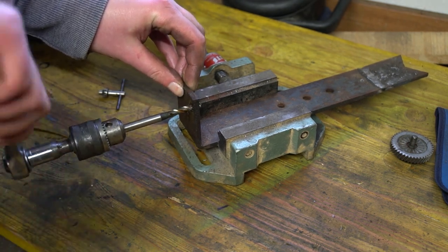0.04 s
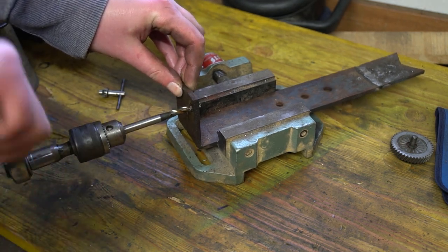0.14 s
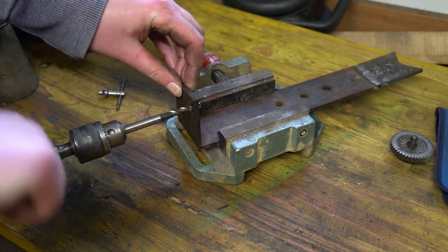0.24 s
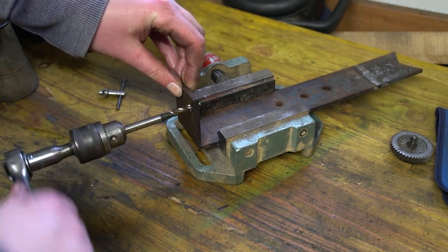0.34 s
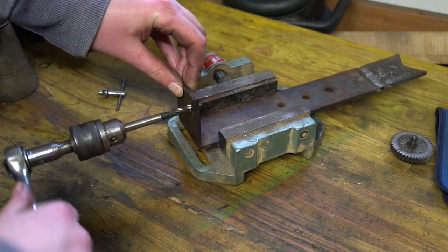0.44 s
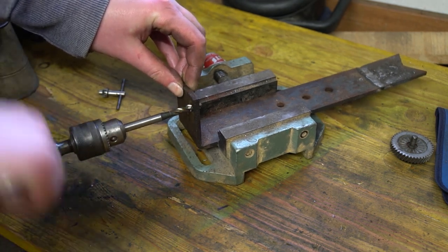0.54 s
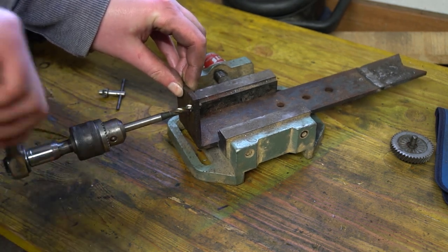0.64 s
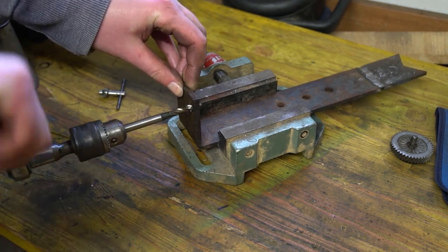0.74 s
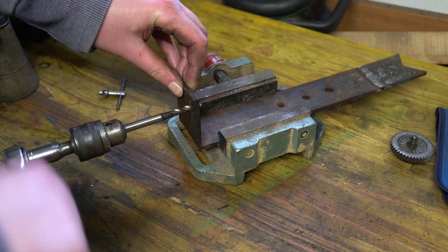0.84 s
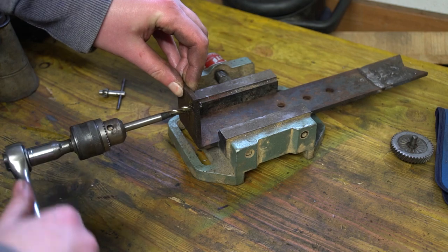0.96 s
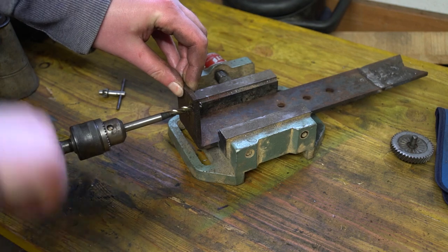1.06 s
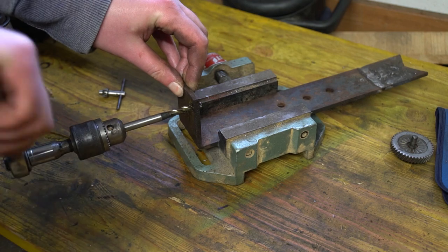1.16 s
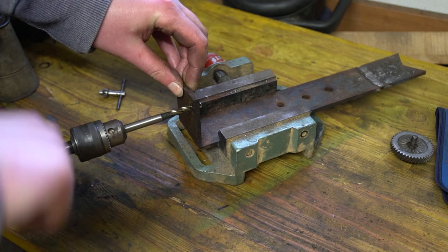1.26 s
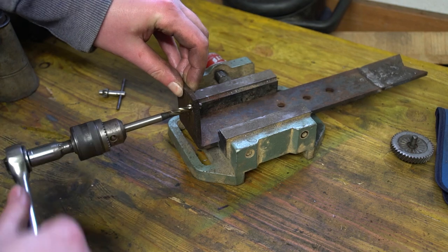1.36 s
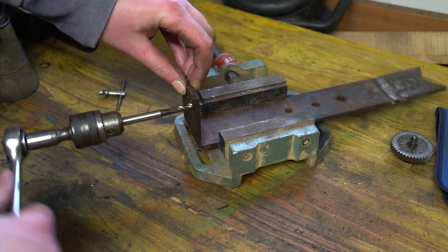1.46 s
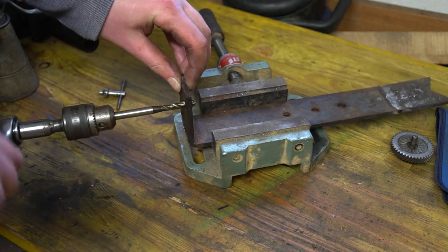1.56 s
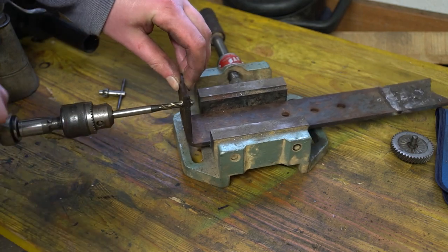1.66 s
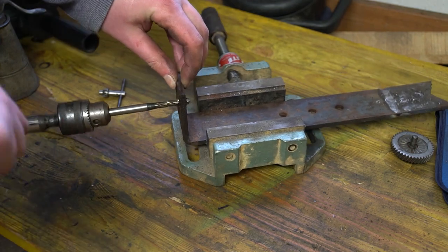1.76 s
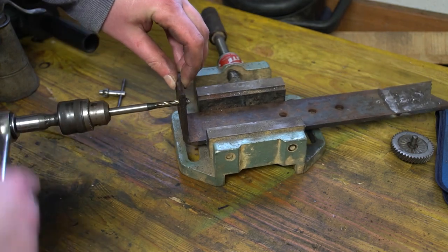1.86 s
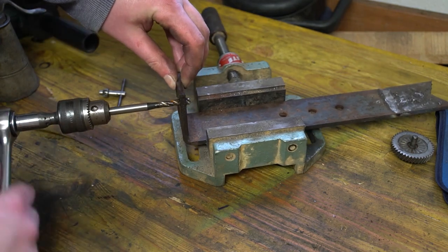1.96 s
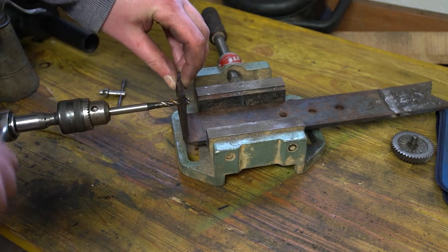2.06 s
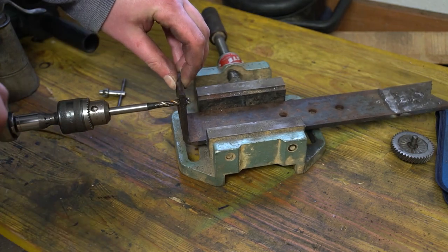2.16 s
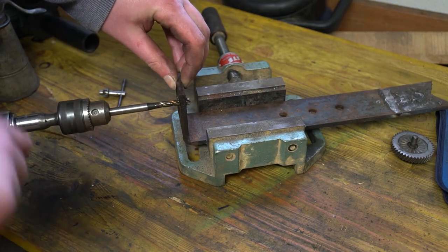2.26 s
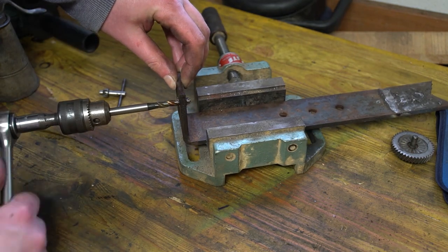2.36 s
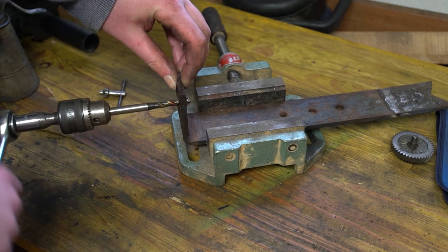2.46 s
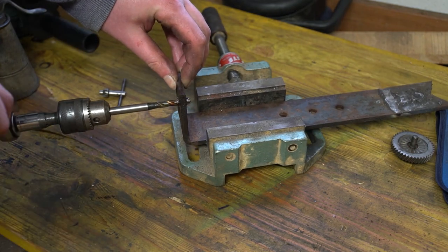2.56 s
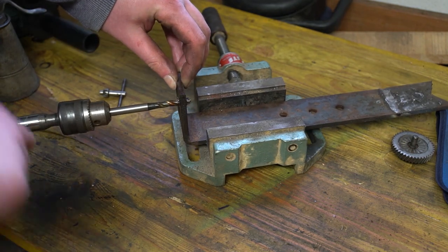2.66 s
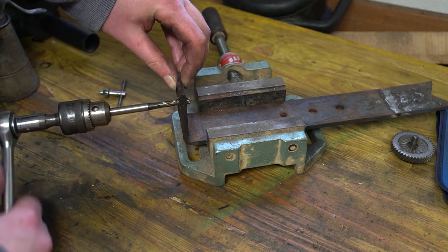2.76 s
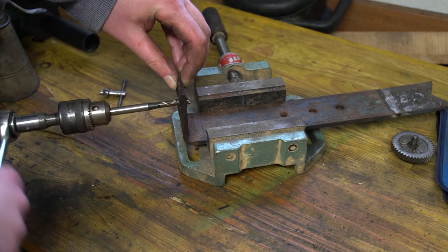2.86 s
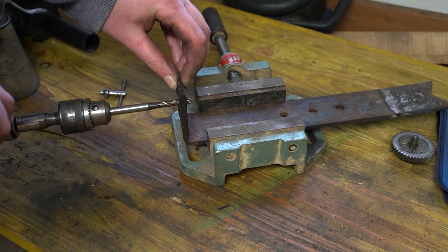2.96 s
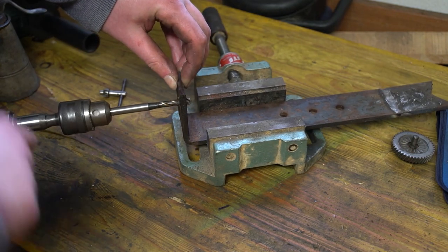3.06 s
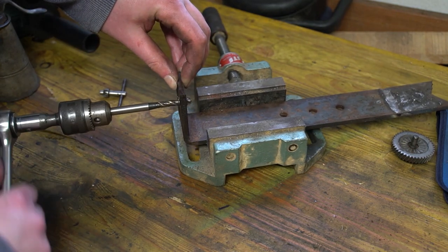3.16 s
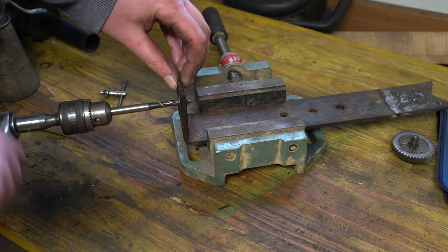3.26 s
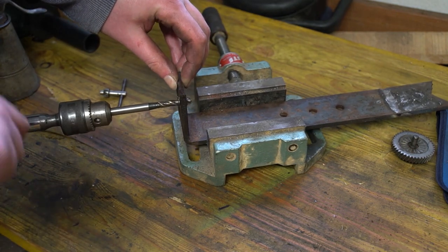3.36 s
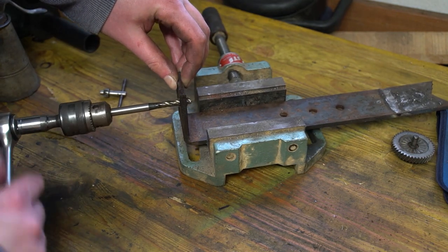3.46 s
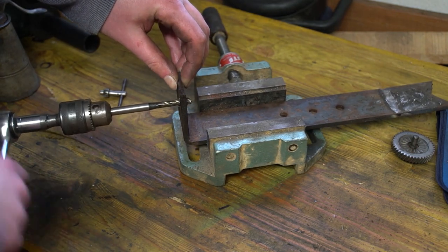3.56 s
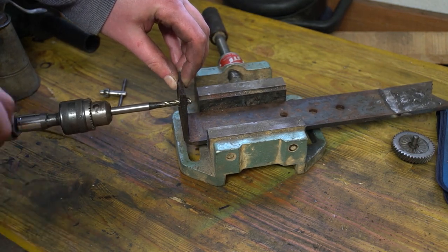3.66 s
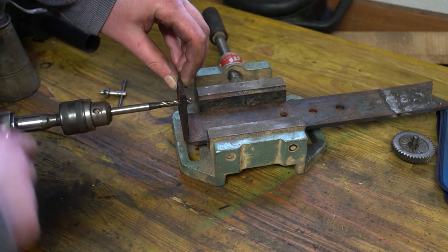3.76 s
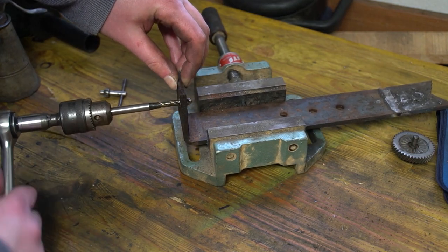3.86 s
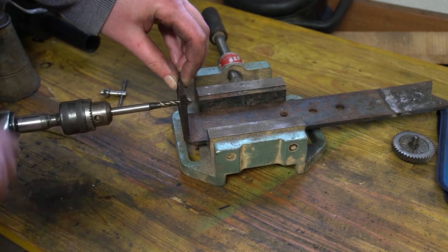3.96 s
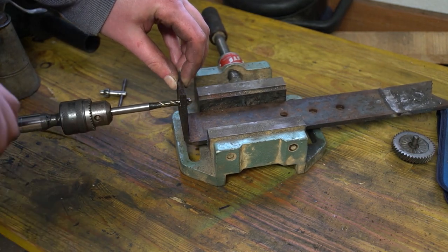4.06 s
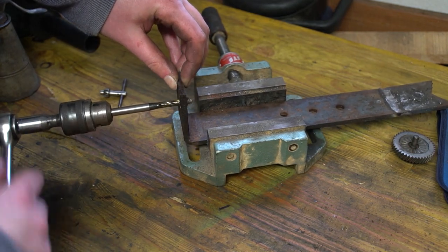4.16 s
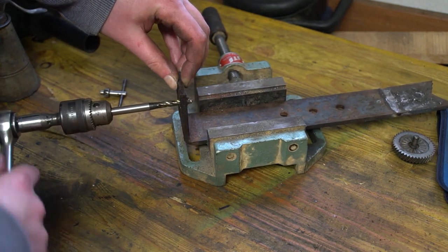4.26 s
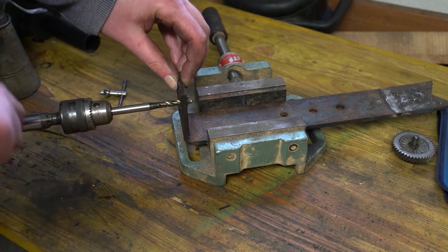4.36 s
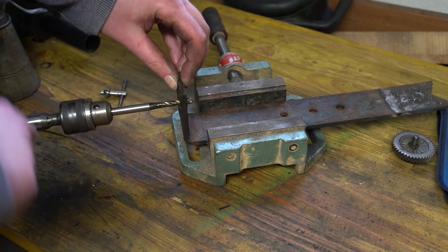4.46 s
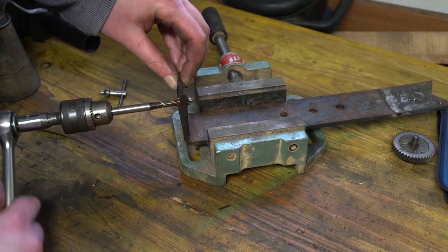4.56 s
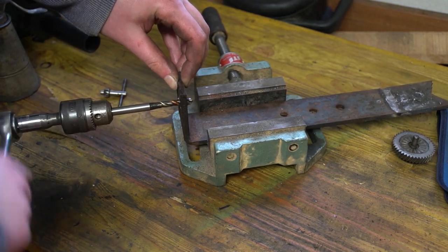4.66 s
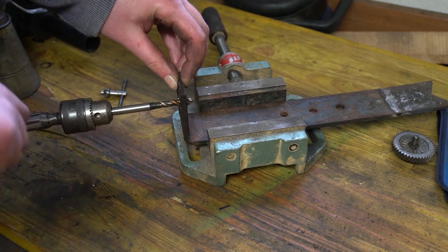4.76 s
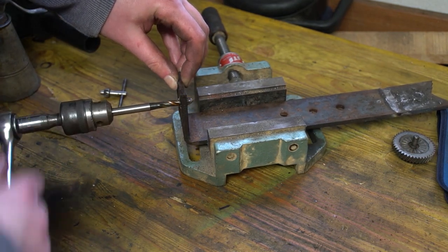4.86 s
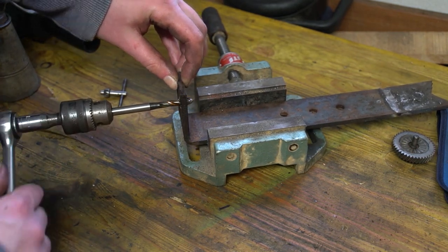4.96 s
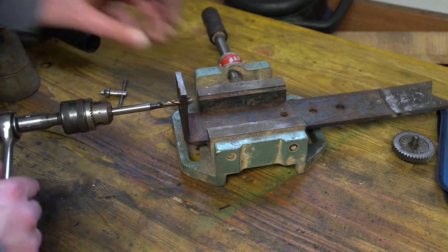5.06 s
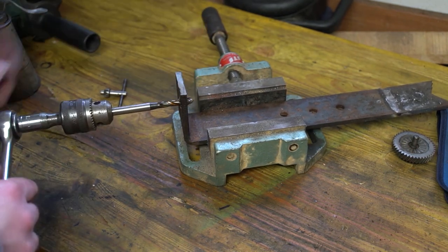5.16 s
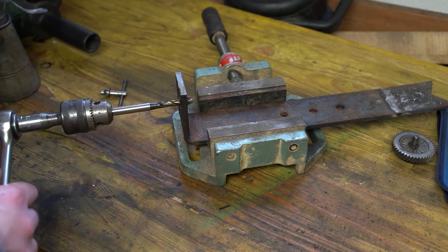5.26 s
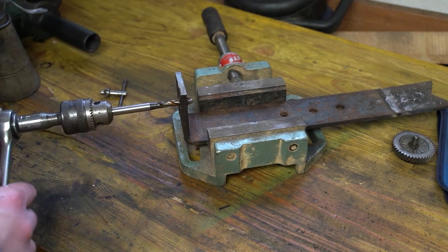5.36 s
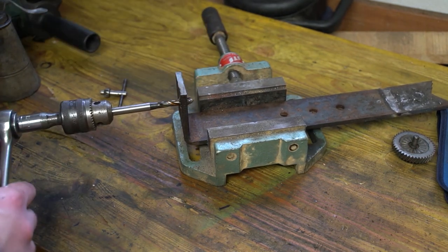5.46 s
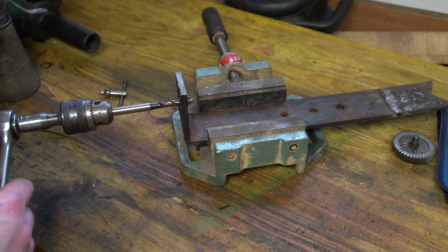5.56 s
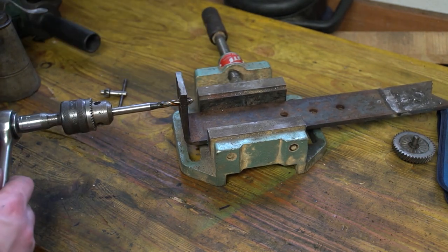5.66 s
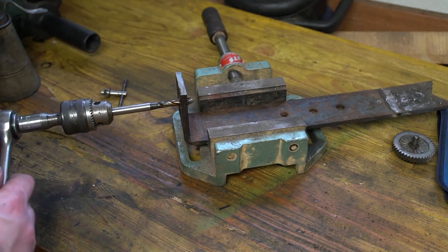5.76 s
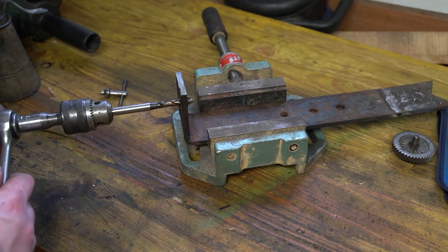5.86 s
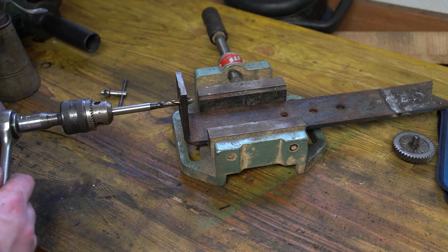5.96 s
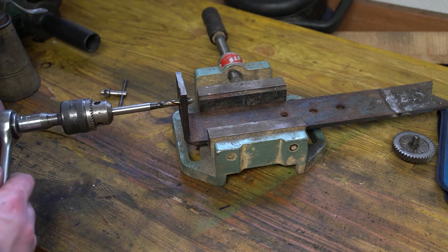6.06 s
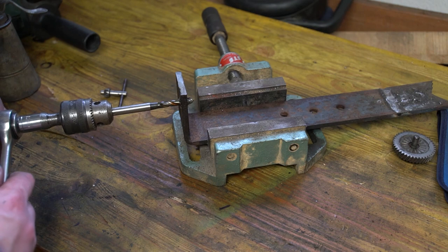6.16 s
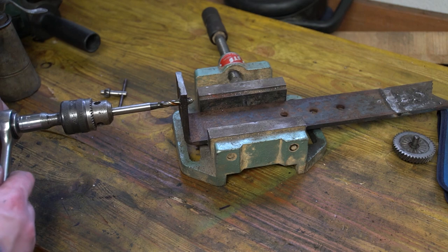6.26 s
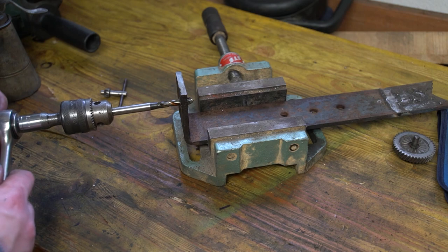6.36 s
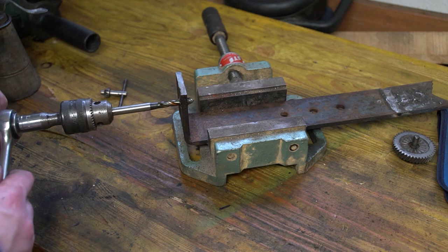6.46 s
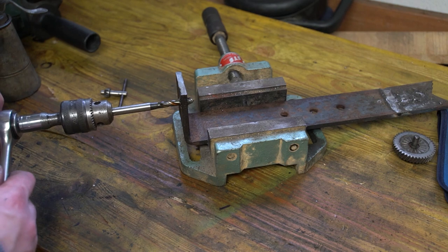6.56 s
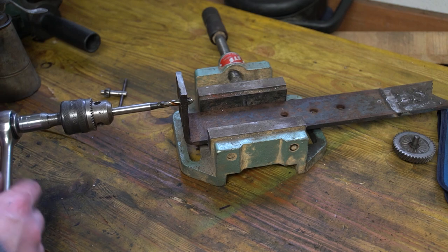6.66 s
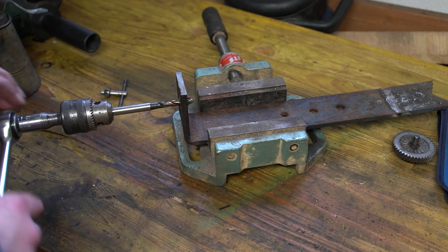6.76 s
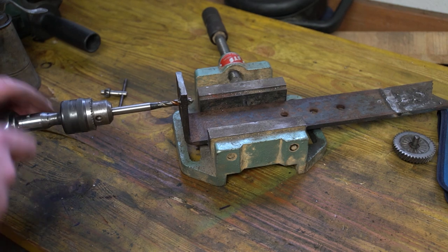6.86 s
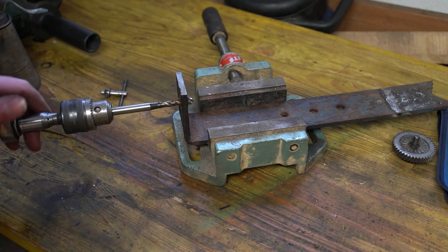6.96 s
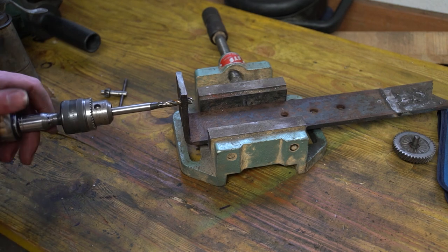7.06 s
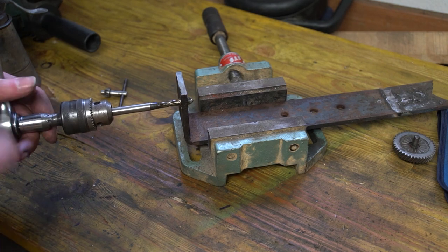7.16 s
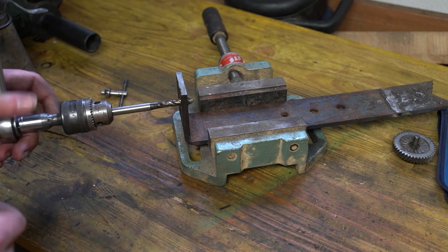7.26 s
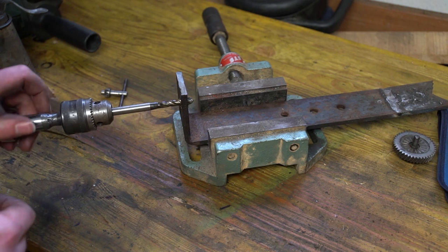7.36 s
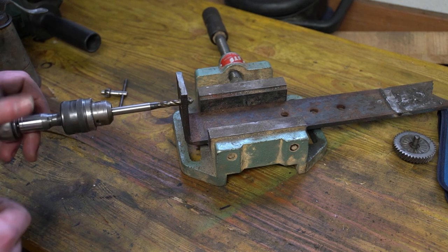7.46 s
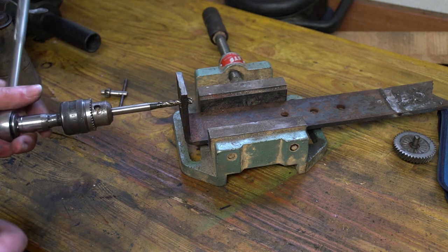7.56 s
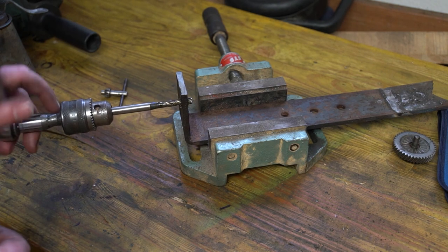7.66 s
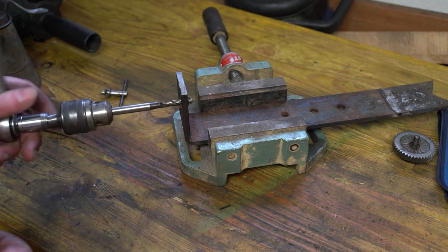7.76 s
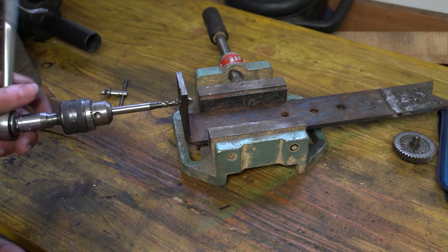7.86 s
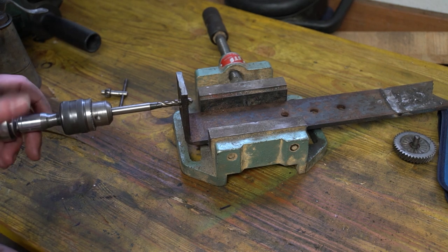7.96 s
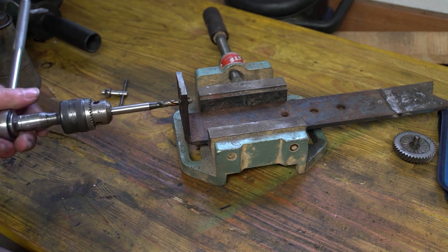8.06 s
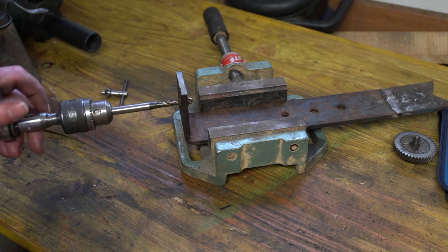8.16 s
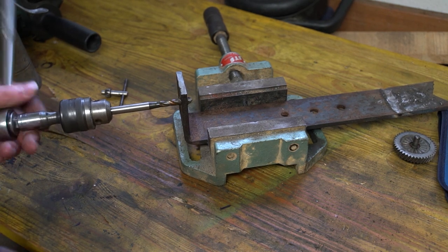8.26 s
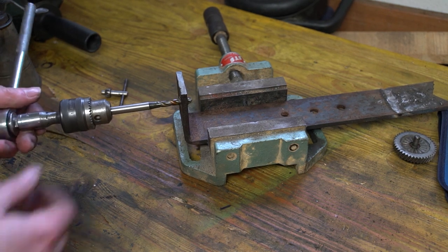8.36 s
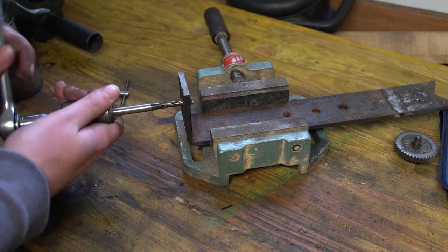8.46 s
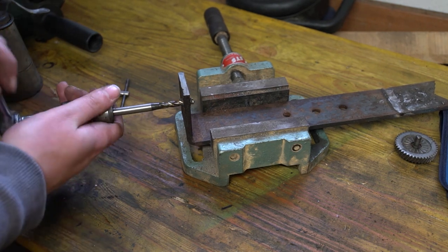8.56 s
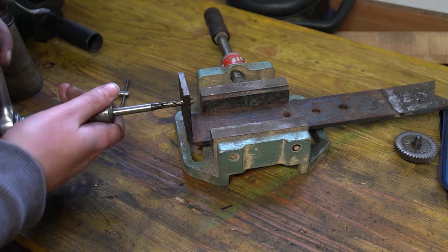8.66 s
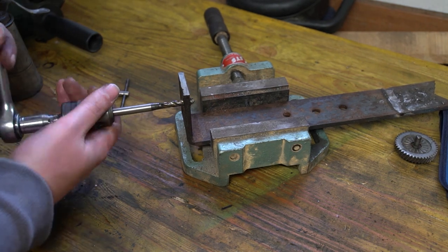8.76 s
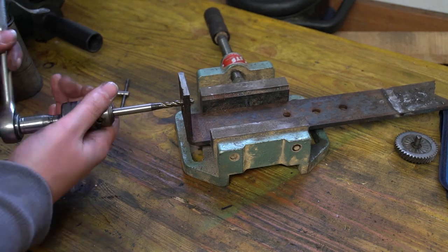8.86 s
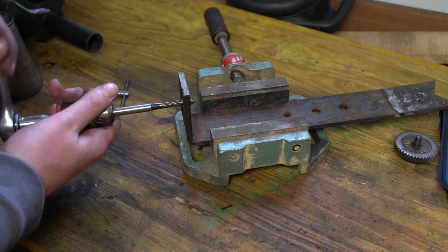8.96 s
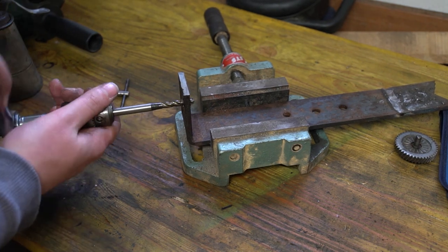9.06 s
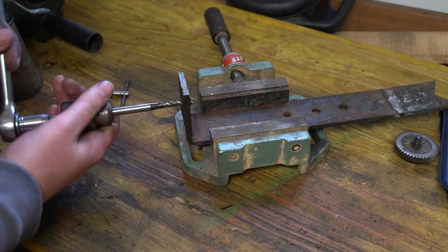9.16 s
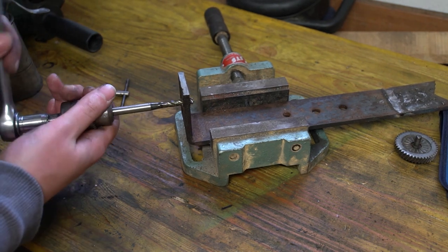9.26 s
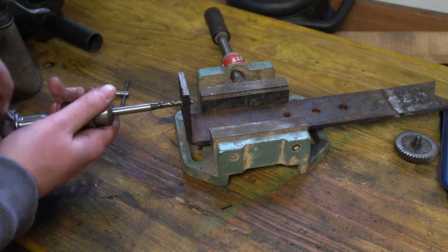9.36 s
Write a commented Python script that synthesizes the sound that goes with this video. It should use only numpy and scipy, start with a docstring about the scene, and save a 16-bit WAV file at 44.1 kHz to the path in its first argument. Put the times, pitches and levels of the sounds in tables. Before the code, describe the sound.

After a brief rub and a click, a hand ratchet swings back and forth, turning a bit through steel held in a vice. Each back swing gives a quick run of bright metallic clicks, with dull handle knocks and faint sleeve rubbing between. Midway the runs pause, leaving a few dry ticks of breaking chips, then the clicking resumes with light socket clacks. It sounds close, in a small, quiet workshop.

```python
"""A brief rub and a click, then short runs of bright clicks: a ratchet handle swings to and fro, turning
a bit through steel in a vice in a small workshop. On each back swing the pawl snaps over the teeth, and
each impact excites the modes of wrench and bench. Between runs the handle knocks, a sleeve rubs, the
socket clacks and a few chips break. A limiter ducks every run, so the room's ring swells up after the
last click."""
import sys
import numpy as np
from scipy import signal
from scipy.fft import rfft, irfft
from scipy.io import wavfile
from scipy.ndimage import uniform_filter1d, minimum_filter1d

SR = 44100
rng = np.random.default_rng(int(sys.argv[2]) if len(sys.argv) > 2 else 0)


def persist_wave(psi):
    """Save psi, clipped to +-1, as 16-bit WAV."""
    counts = np.round(np.clip(psi, -1, 1) * 32767).astype(np.int16)
    wavfile.write(sys.argv[1], SR, np.atleast_2d(counts).T)


N = 415422
TIME = np.arange(N) / SR

# Levels are relative: each source adds its own gain.
# Envelope of the bench's rumble under the hands: t/s, level/dB
RUMBLE = [(0.0, -65.5), (0.97, -58.5), (0.99, -48), (1.18, -60), (1.36, -46), (1.47, -67), (1.57, -47),
          (1.65, -62), (2.05, -47.5), (2.1, -56), (4.59, -57), (6.38, -74), (6.45, -51.5), (6.66, -69.5),
          (7.61, -54), (9.42, -61)]
# Hands leaning on the bench: t/s, level/dB
THUMPS = [(0.44, -48.5), (1.325, -40), (1.53, -44), (3.109, -48), (4.429, -43), (7.614, -44), (7.903, -41),
          (8.322, -45.5)]
# Spectral densities of the shaking bench, the still room and the rubbing: f/Hz, level/dB
SHAKE_SPECTRUM = [(20, 3), (40, 4.5), (70, -2.5), (130, 1.5), (250, -10), (500, -5.5), (1000, -47),
                  (2000, -31), (5000, -39)]
AIR_SPECTRUM = [(15, -28), (25, 8.5), (123, -4), (166, -40.5), (229, 5.5), (317, -8.5), (476, -3.5),
                (560, -6.5), (1370, -17.5), (2160, -21), (12900, -28.5), (16000, -33)]
RUB_SPECTRUM = [(88, -27.5), (150, -8.5), (425, -6), (515, -4.5), (701, -7.5), (1540, -5.5), (2400, -13),
                (2970, -12.5), (12600, -23), (15000, -26)]
# Hand and sleeve sliding on the tool: start t/s, peak t/s, end t/s, level/dB
RUBS = [(0.0, 0.01, 0.091, -42.5), (0.13, 0.203, 0.22, -50.5), (0.407, 0.513, 0.53, -51),
        (0.904, 0.965, 0.97, -56), (1.424, 1.514, 1.85, -40.5), (8.438, 8.48, 8.52, -46),
        (8.7, 9.0, 9.12, -52)]
# Light steel-on-steel touches in chuck and drive: t/s, level/dB, bench level/dB
TICKS = [(0.1017, -56, -37), (1.0306, -35, -48), (1.8233, -31, -40.5), (1.9624, -27.5, -38),
         (2.7184, -38, -39), (2.8746, -19, -43), (3.8761, -35.5, -41), (4.2707, -39.5, -43.5),
         (5.1093, -38.5, -50.5), (5.2584, -44, -60), (5.3572, -39, -56), (6.4323, -21, -35),
         (6.8508, -46, -45.5), (7.001, -44.5, -44), (7.5742, -31.5, -42.5), (8.6842, -22.5, -51),
         (8.764, -46, -50.5), (9.3214, -19.5, -66)]
# Modes of wrench, chuck and bit: f/Hz, level/dB, T60/s
STEEL_MODES = [(2224, -39.5, 0.029), (2720, -39, 0.07), (3326, -41, 0.055), (4820, -34, 0.045),
               (5000, -34.5, 0.06), (7390, -28, 0.019), (8888, -18.5, 0.041), (8700, -38.5, 0.018),
               (9200, -32.5, 0.026), (12200, -28.5, 0.023), (12620, -22, 0.082), (13940, -25.5, 0.064),
               (13700, -48, .03)]
# Modes of vice and wooden bench top: f/Hz, bandwidth/Hz, level/dB
BENCH_MODES = [(122, 24, -15.5), (212, 34, -8), (376.5, 94, -4), (489, 40, -0.5), (600, 120, -2.5),
               (760, 120, -1.5), (951, 107, -1.5), (1235, 79, -7.5), (1406, 120, -1), (1990, 79, -11)]
# Back swings: first tooth t/s, last tooth t/s, tooth count, first gap/coasting gap, last gap/coasting gap,
# level/dB, share of the upper ring (0-1), crack level/dB, wrench level/dB, slack t/s, slack level/dB
SWINGS = [(0.012, 0.0124, 1, 1, 1, -18.5, 0.9, -14, -6, 0.002, -27),
          (0.5683, 0.7068, 7, 1.18, 2.49, -16.5, .6, -21, -2, 0.5356, -23),
          (1.0495, 1.2471, 8, 2.8, 5.1, -17.5, 0.23, -20.5, -9.5, 1.0435, -23),
          (1.5908, 1.7300, 6, 1.01, 1.45, -19, .6, -20, -5.5, 1.546, -38),
          (2.0739, 2.2044, 7, 1.7, 2.0, -17, 0, -21.5, -3, 2.0323, -31),
          (2.5315, 2.6125, 6, 1.01, 1.58, -21.5, 0.45, -23, -7.5, 2.5153, -22.5),
          (2.9278, 3.0425, 7, 1.05, 2.44, -24, .7, -16.5, -8.5, 2.911, -29),
          (3.2945, 3.3777, 6, 1.25, 1.9, -22.5, .6, -20, 2, 3.2664, -30),
          (3.6433, 3.7214, 6, 1.01, 1.66, -22.5, .55, -23.5, -6, 3.6172, -31),
          (3.9863, 4.1006, 7, 0.99, 2.4, -19, 0.05, -22, -7, 3.9549, -34.5),
          (4.3670, 4.4583, 6, 1.11, 2.1, -21.5, 0.067, -20, -2, 4.342, -41),
          (4.7037, 4.8174, 7, 1.04, 1.3, -25, 0.41, -28.5, -1, 4.6833, -40.5),
          (7.3718, 7.4475, 5, 1.09, 1.36, -16, 0.8, -17.5, -5.5, 7.3277, -28),
          (7.6623, 7.7608, 10, 2.15, 1.86, -17, .3, -19, -7.5, 7.6331, -31),
          (7.9365, 8.0007, 6, 2.2, 2.7, -21, 0.23, -15.5, -5.5, 7.9064, -39),
          (8.1748, 8.1858, 2, 0.93, 1, -21, 0.27, -15, -5, 8.1359, -40),
          (8.2457, 8.2457, 1, 1, 1.2, -17.5, 0.017, -17.5, -4.5, 8.225, -45),
          (8.5039, 8.6098, 8, 1.58, 1.48, -23, .7, -19, -3, 8.4512, -50),
          (9.0107, 9.1084, 7, 1.03, 2.35, -26, 0.52, -16.5, -3, 8.992, -24),
          (9.3336, 9.4144, 7, 1.17, 1.54, -23, 0.72, -20, -8, 9.3028, -36)]
# Reverberation time of the workshop: f/Hz, T60/s
ROOM_DECAY = [(100, 0.3), (500, 0.17), (1500, 0.3145), (5000, 0.11), (9000, 0.173), (14000, 0.2)]
# Strength of the reverberation: f/Hz, level/dB
ROOM_SPECTRUM = [(100, 3.5), (500, -1), (1500, -3), (5000, -9.5), (9000, -5.5), (14000, -14.5)]
# Handle and bit taking up the load: t/s, level/dB, f/Hz
KNOCKS = [(0.095, -28.5, 641), (0.683, -26, 604), (0.748, -30.5, 893), (0.975, -38, 503), (1.048, -24, 480),
          (1.343, -30, 1190), (1.816, -31, 495), (1.856, -30, 1030), (1.887, -25.5, 1260),
          (1.964, -26.5, 480), (2.033, -29, 490), (2.289, -27, 437), (2.497, -29.5, 474),
          (2.515, -28, 1494), (2.911, -32.5, 483), (3.087, -30, 631), (3.387, -24, 490),
          (3.617, -30.5, 455), (3.796, -30.5, 684), (3.904, -22, 550), (4.617, -21, 530),
          (4.675, -30.5, 1110), (5.095, -43.5, 548), (5.604, -47.5, 493), (5.754, -49, 373),
          (6.463, -38.5, 484), (6.808, -39, 630), (6.84, -39, 500), (7.187, -49.5, 495), (7.51, -27, 488),
          (8.271, -23.5, 583), (8.861, -37.5, 656), (8.989, -33, 460)]
# Loose socket striking its square drive: t/s, level/dB, f/Hz
CLACKS = [(0.103, -35, 2570), (1.279, -46, 3640), (6.852, -48.5, 3100), (7.9057, -36, 2200),
          (8.1364, -38.5, 2240), (8.4513, -46, 3240), (8.993, -46, 2500), (9.3216, -35, 3230)]
# Chips snapping off at the cutting edge: t/s, level/dB
CHIPS = [(5.6724, -40.5), (5.8859, -24.5), (5.9249, -25.5), (5.9577, -36), (6.227, -44.5), (6.2817, -37)]


def from_db(db):
    """Amplitude grows tenfold with every 20 dB."""
    return 10 ** (np.asarray(db) / 20)


def at_hz(points, hz):
    """Interpolation on a logarithmic frequency axis."""
    points = np.array(points)
    return np.interp(np.log(np.maximum(hz, 1)), np.log(points[:, 0]), points[:, 1])


def add(out, s, sound):
    """Superposition: a sound joins the mix at s seconds."""
    start = min(max(round(s * SR), 0), N)
    out[start:start + len(sound)] += sound[:N - start]


def butter(x, hz, kind, order=2):
    """Causal Butterworth filtering, maximally flat in the passband."""
    return signal.sosfilt(signal.butter(order, hz, kind, fs=SR, output="sos"), x)


def fade(t, t60):
    """Exponential damping: 60 dB are lost in t60 seconds."""
    return np.exp(-np.log(1000) * t / t60)


def resonate(x, hz, width_hz):
    """Forced response of a damped oscillator."""
    r = np.exp(-np.pi * width_hz / SR)
    return signal.lfilter([1, 0, -1], [1, -2 * r * np.cos(2 * np.pi * hz / SR), r * r], x)


def peak_one(x):
    """Normalisation to unit peak."""
    return x / np.abs(x).max()


def unit_energy(x):
    """Normalisation to the energy of a unit pulse lasting half a millisecond."""
    return x * np.sqrt(SR / 2000 / np.sum(x ** 2))


def noise(spectrum):
    """Spectral shaping of white noise, at unit rms."""
    gain = from_db(at_hz(spectrum, np.fft.rfftfreq(N, 1 / SR)))
    x = irfft(rfft(rng.standard_normal(N)) * gain, N)
    return x / x.std()


def grain(hz, depth_db):
    """Random amplitude modulation gives friction its roughness."""
    flutter = butter(rng.standard_normal(N), hz, "low")
    return from_db(depth_db * flutter / flutter.std())


def contact(t60, size=900):
    """Contact chatter: steel settles on steel in a decaying burst of noise."""
    return rng.standard_normal(size) * fade(TIME[:size], t60)


def bench_shake(rumble_db=-1, thump_db=-5, rise_s=.015, thump_t60=.25):
    """Forced vibration: the bench rumbles under the hands and swells when they lean on it."""
    envelope = from_db(rumble_db + np.interp(TIME, *np.transpose(RUMBLE)))
    t = TIME[:22000]
    thump = peak_one((1 - np.exp(-t / rise_s)) * fade(t, thump_t60))
    for s, db in THUMPS:
        add(envelope, s, from_db(db + thump_db) * thump)
    return envelope * noise(SHAKE_SPECTRUM)


def rubs(depth_db=18, sleeve_db=-65, sleeve_peak_s=.08, sleeve_end_s=.39):
    """Sliding friction: skin and cloth make grainy swells, and the sleeve brushes on each forward stroke."""
    strokes = [(last, last + sleeve_peak_s, last + sleeve_end_s, sleeve_db) for _, last, *_ in SWINGS]
    swell = np.zeros(N)
    for *times, db in [*RUBS, *strokes]:
        swell += from_db(db + np.interp(TIME, times, [-depth_db, 0, -depth_db], -np.inf, -np.inf))
    return swell * grain(hz=120, depth_db=.7) * noise(RUB_SPECTRUM)


def ticks(catches, low_hz=2500, top_hz=12000, wrench_db=-3, bench_db=10.5):
    """Backlash: play in the drive closes around each swing with a click that carries into the vice."""
    out, blows = np.zeros((2, N))
    slack = [(s, db, -41) for *_, s, db in SWINGS]  # columns as in TICKS
    caught = [(s, -39, -45) for s in catches]
    for s, db, carried_db in [*TICKS, *slack, *caught]:
        chatter = butter(contact(t60=.024), low_hz, "high", order=1)
        click = unit_energy(butter(chatter, top_hz, "low"))
        add(out, s, from_db(db) * click / 2)
        add(out, s, from_db(db + wrench_db) * wrench())
        add(blows, s, from_db(carried_db + bench_db) * unit_energy(contact(t60=.066, size=4000)))
    return out + bench(blows)


def wrench(drive_hz=0, boost_db=7, reach_hz=550, scatter_db=5, detune=.006):
    """Free vibration of struck steel: modes near drive_hz answer most, and the grip detunes each."""
    hz, db, t60 = np.array(STEEL_MODES).T[:, :, None]
    level, pitch, phase = rng.standard_normal((3, *hz.shape))
    t = TIME[:6000]
    sympathy_db = boost_db * np.exp(-((hz - drive_hz) / reach_hz) ** 2)
    modes = np.sin(2 * np.pi * (hz * (1 + detune * pitch) * t + phase))
    return np.sum(from_db(db + sympathy_db + scatter_db * level) * modes * fade(t, t60), axis=0)


def bench(blows):
    """Modal superposition: broad resonances of vice and bench top add with alternating sign."""
    return sum((-1) ** k * from_db(db) * np.sqrt(width / SR) * resonate(blows, hz, width)
               for k, (hz, width, db) in enumerate(BENCH_MODES))


def tooth_times(first, last, count, first_gap, last_gap, run_up_power=3, brake_power=7):
    """Click rate follows angular speed: the hand speeds up, coasts, then brakes sharply."""
    u = np.linspace(0, 1, round(count) - 1)
    gaps = 1 + (first_gap - 1) * (1 - u) ** run_up_power + (last_gap - 1) * u ** brake_power
    return first + (last - first) * np.append(0, np.cumsum(gaps) / gaps.sum())


def pawl(rings_hz=(12600, 13870), width_hz=420, detune=.01, snap_t60=.0075,
         pawl_db=19.5, crack_db=9, bench_db=-20.5, scatter_db=1.8, seat_scatter=.1,
         full_drop_s=.018, hurry_loss_db=3.3, brake_loss_db=2):
    """Impact excitation: each tooth gives a crack and a ping, split between two rings as the pawl seats."""
    out, blows = np.zeros((2, N))
    for *timing, db, upper_share, hardness_db, wrench_db, _, _ in SWINGS:
        times = tooth_times(*timing)
        gaps = np.clip(np.diff(times, prepend=-1), 1 / SR, full_drop_s)
        gap_halvings = np.log2(full_drop_s / gaps)
        for s, halvings, progress in zip(times, gap_halvings, np.linspace(-.5, .5, len(times))):
            # The pawl drops less far between hurried teeth, and softens through the swing.
            loss_db = hurry_loss_db * halvings + brake_loss_db * progress
            force = from_db(db + pawl_db - loss_db + scatter_db * rng.standard_normal())
            share = np.clip(upper_share + seat_scatter * rng.standard_normal(), 0, 1)
            pitches = np.array(rings_hz) * (1 + detune * rng.standard_normal(2))
            low, high = (unit_energy(resonate(contact(snap_t60), hz, width_hz)) for hz in pitches)
            ping = np.sqrt(1 - share) * low + np.sqrt(share) * high
            snap = butter(contact(snap_t60), hz=5000, kind="high")
            crack = unit_energy(butter(snap, hz=12000, kind="low"))
            add(out, s, force / 2 * (ping + from_db(crack_db + hardness_db) * crack))
            add(out, s, force * from_db(wrench_db) * wrench(pitches[round(share)]))
            add(blows, s, force * from_db(bench_db) * unit_energy(contact(t60=.052, size=4000)))
    return out + bench(blows)


def rasp(rasp_db=-50, band_hz=(2400, 9000), overrun_s=.016, release_t60=.21):
    """Friction noise: the pawl drags over the teeth, ever louder until the handle stops."""
    drag = np.zeros(N)
    for first, last, *_ in SWINGS:
        stop = last + overrun_s
        drag += np.interp(TIME, [first, stop], [0, 1]) * fade(np.maximum(TIME - stop, 0), release_t60)
    friction = grain(hz=350, depth_db=4) * rng.standard_normal(N)
    scrape = butter(friction, band_hz, "band", order=1)
    return from_db(rasp_db) * drag * scrape / scrape.std()


def small_knocks(catches, catch_db=-37.5, catch_hz=639, pitch_spread=.25,
                 fingers_per_s=5, finger_db=14, finger_hz=513, scatter_db=3, count=200):
    """Light impacts (t/s, level/dB, f/Hz): the pawl catches, and fingers shift at random."""
    times = np.cumsum(rng.uniform(0, 2, count)) / fingers_per_s
    rumble_db = np.interp(times, *np.transpose(RUMBLE))  # fingers knock harder as the bench shakes more
    levels = rumble_db + finger_db + scatter_db * rng.standard_normal(count)
    pitches = finger_hz * np.exp(pitch_spread * rng.standard_normal(count))
    caught = [(s, catch_db, catch_hz * np.exp(pitch_spread * rng.standard_normal())) for s in catches]
    return caught + [row for row in zip(times, levels, pitches) if row[0] < N / SR]


def knocks(catches, rise_s=.0011, knock_t60=.027, body_db=-2, grit_db=-6, bench_db=-1.5, size=4000):
    """Heavy damping: the hand stops a soft blow within a few cycles, while the vice rattles loosely."""
    out, blows = np.zeros((2, N))
    t = TIME[:size]
    onset = 1 - np.exp(-t / rise_s)
    for s, db, hz in [*KNOCKS, *small_knocks(catches)]:
        body = peak_one(np.sin(2 * np.pi * hz * t) * onset * fade(t, knock_t60))
        rattle = onset * contact(t60=.077, size=size)
        grit = unit_energy(butter(rattle, [hz / 2, hz * 2], "band"))
        add(out, s, from_db(db) * (from_db(body_db) * body + from_db(grit_db) * grit))
        add(blows, s, from_db(db + bench_db) * unit_energy(rattle))
    return out + bench(blows)


def socket_clacks(width_hz=450, clack_db=2.5):
    """Resonance: the loose socket's brief rattle drives one hollow mode."""
    out = np.zeros(N)
    for s, db, hz in CLACKS:
        ring = resonate(contact(t60=.058, size=3000), hz, width_hz)
        add(out, s, from_db(db + clack_db) * peak_one(ring))
    return out


def chips(low_hz=7000, chip_db=-4.5):
    """Fracture: a chip breaks under load with a dry, bright tick."""
    out = np.zeros(N)
    for s, db in CHIPS:
        snap = butter(contact(t60=.015), low_hz, "high", order=1)
        add(out, s, from_db(db + chip_db) * unit_energy(snap))
    return out


def workshop(x, first_echo_s=.0072, size=32768):
    """Reverberation: a diffuse tail follows the first wall echo, each band decaying at its own rate."""
    t, hz = TIME[:size], np.fft.rfftfreq(size, 1 / SR)
    white, tail = rfft(rng.standard_normal(size)), np.zeros(size)
    edges = np.geomspace(40, SR / 2, 19)
    for low, high in zip(edges, edges[1:]):
        centre = np.sqrt(low * high)
        band = irfft(white * (hz >= low) * (hz < high))
        decay = fade(t, at_hz(ROOM_DECAY, centre)) * (t > first_echo_s)
        tail += from_db(at_hz(ROOM_SPECTRUM, centre)) * band * decay / np.linalg.norm(decay)
    return signal.fftconvolve(x, tail)[:N]


def scene(air_db=-66, damped_room_db=-3, catch_after_s=.055, catch_scatter_s=.012):
    """Superposition of the tool's direct and reverberant sound, the shaking bench and still air."""
    background = bench_shake() + from_db(air_db) * noise(AIR_SPECTRUM)
    # After the last tooth the handle reverses and the pawl catches.
    catches = [last + catch_after_s + catch_scatter_s * rng.standard_normal() for _, last, *_ in SWINGS]
    bright = pawl() + rasp() + ticks(catches) + socket_clacks() + rubs()
    damped = chips() + knocks(catches)
    room = workshop(bright + from_db(damped_room_db) * damped)
    return (bright + damped + room + background)[None]


def record(dry, limit_db=-18.5, slope=.97, hold_s=.008, release_db_per_s=590, smooth=32, cutoff_hz=15800):
    """Peak limiting: the gain drops at loud clicks, holds, then recovers; a low-pass cuts the top."""
    excess_db = np.maximum(20 * np.log10(np.abs(dry[0]) + 1e-9) - limit_db, 0)
    hold = round(hold_s * SR)
    held_db = -minimum_filter1d(-excess_db, hold, origin=(hold - 1) // 2)
    recovery_db = release_db_per_s * TIME
    duck_db = np.maximum.accumulate(held_db + recovery_db) - recovery_db
    gain_db = uniform_filter1d(minimum_filter1d(-slope * duck_db, smooth), smooth)
    low_pass = signal.ellip(10, .2, 70, cutoff_hz, fs=SR, output="sos")
    return signal.sosfilt(low_pass, dry * from_db(gain_db))


dry = scene()
out = record(dry)
persist_wave(out)
```